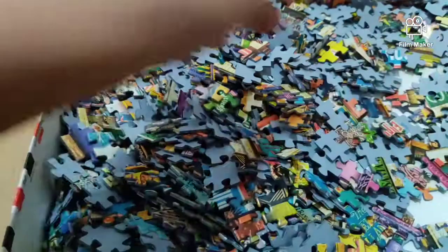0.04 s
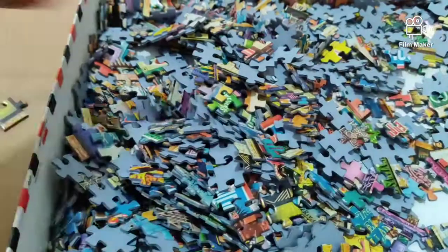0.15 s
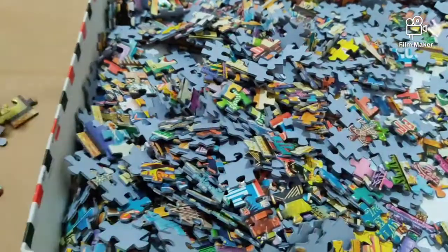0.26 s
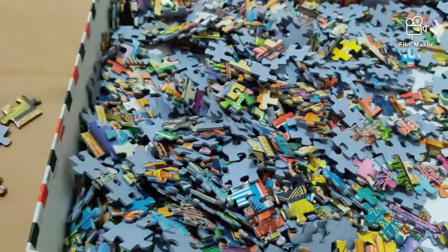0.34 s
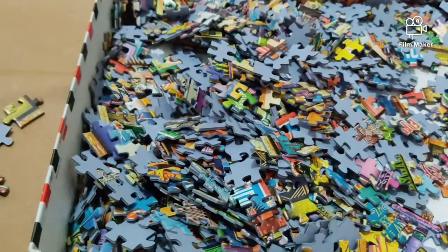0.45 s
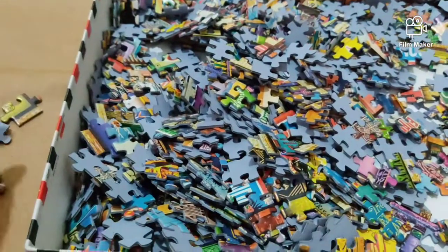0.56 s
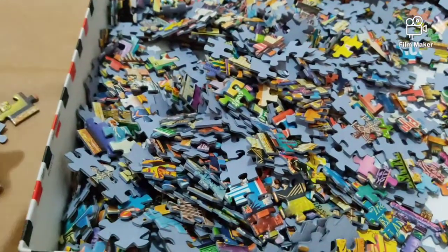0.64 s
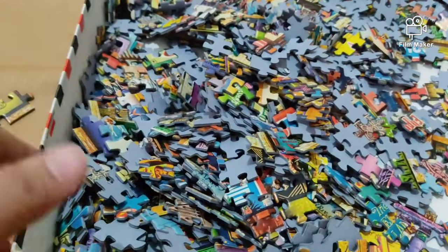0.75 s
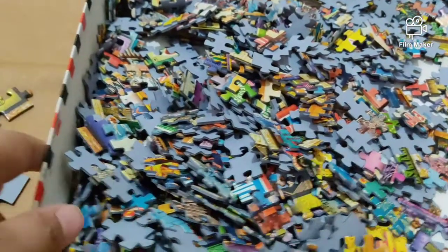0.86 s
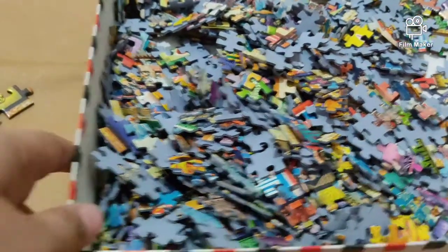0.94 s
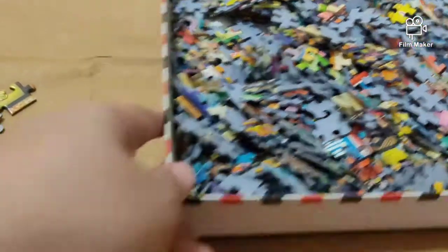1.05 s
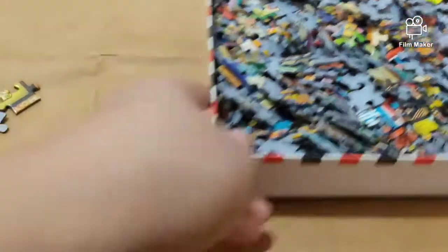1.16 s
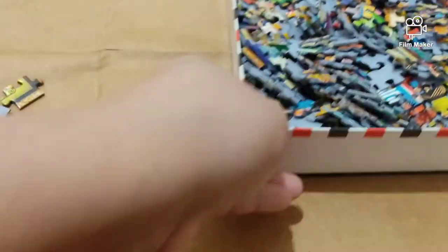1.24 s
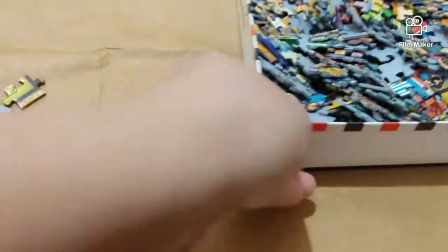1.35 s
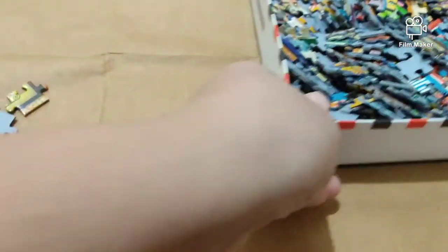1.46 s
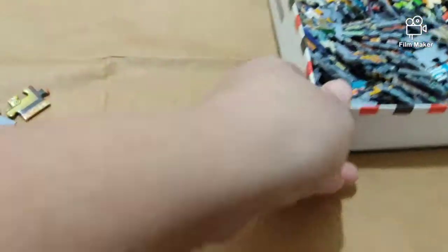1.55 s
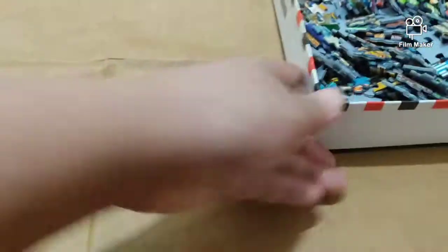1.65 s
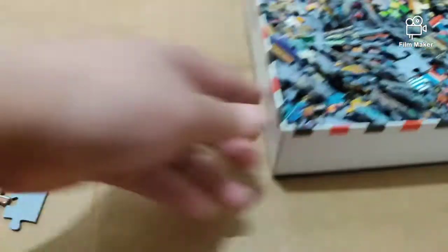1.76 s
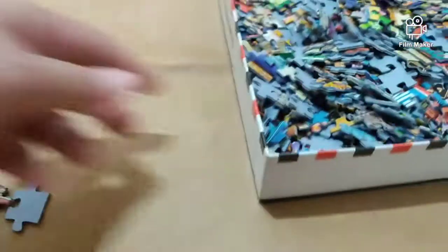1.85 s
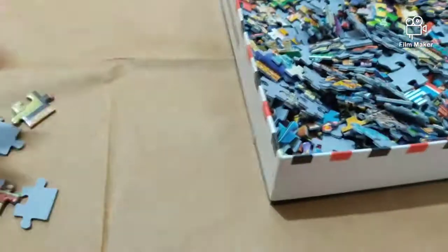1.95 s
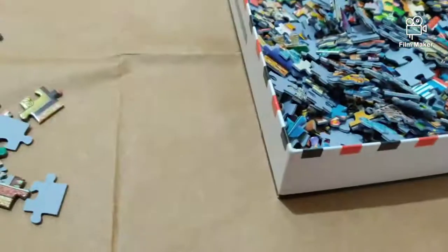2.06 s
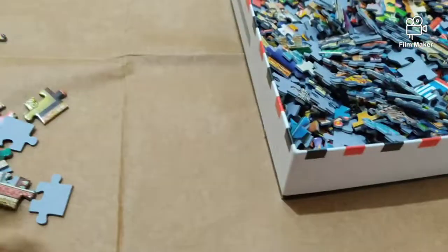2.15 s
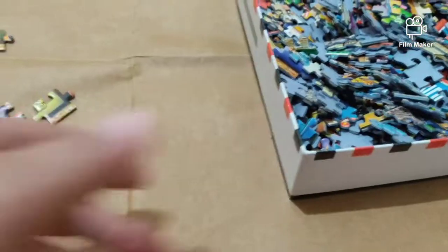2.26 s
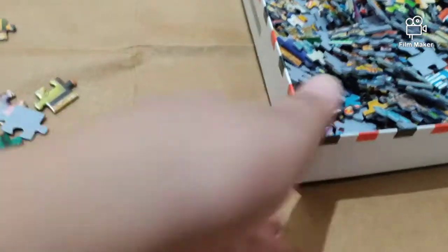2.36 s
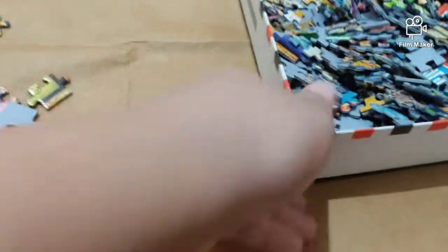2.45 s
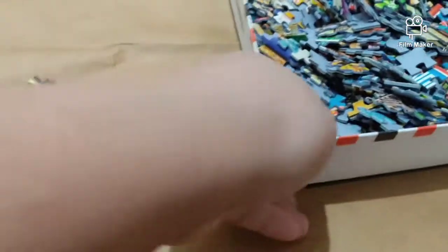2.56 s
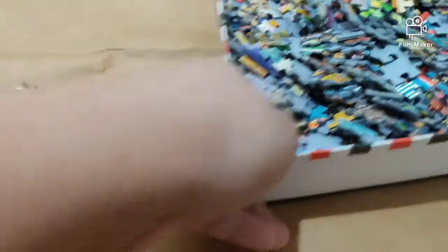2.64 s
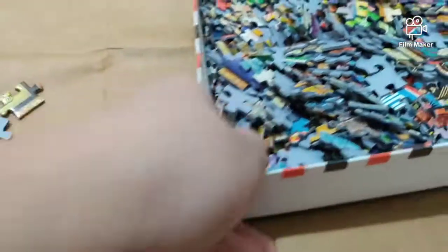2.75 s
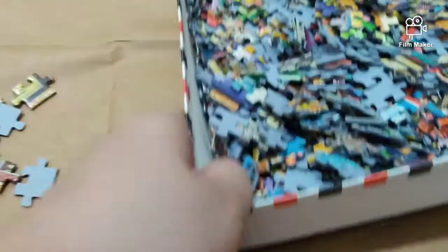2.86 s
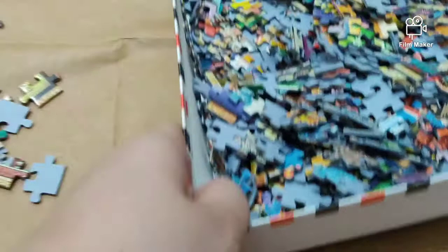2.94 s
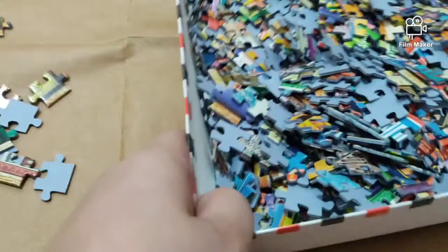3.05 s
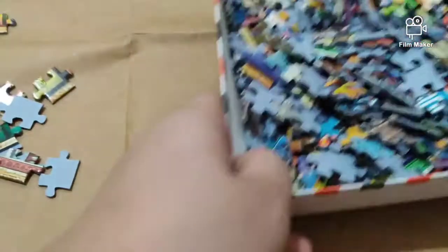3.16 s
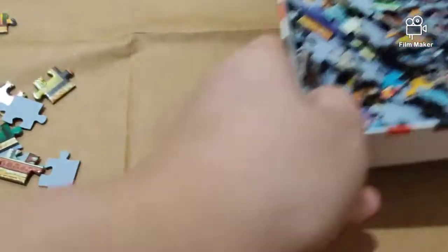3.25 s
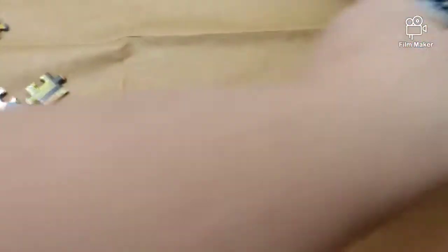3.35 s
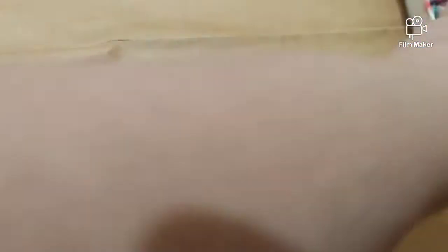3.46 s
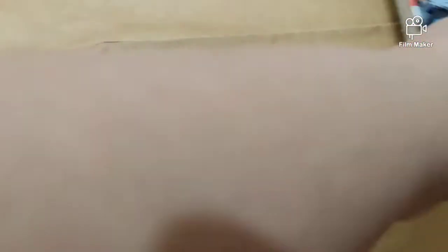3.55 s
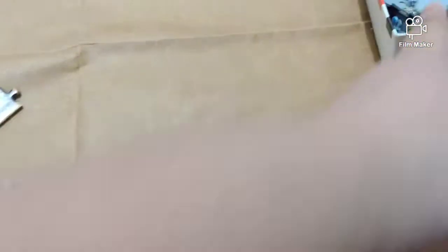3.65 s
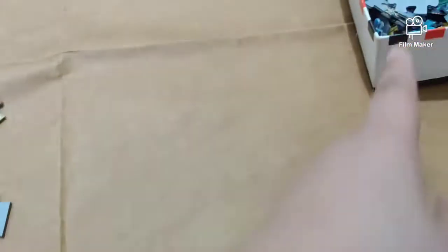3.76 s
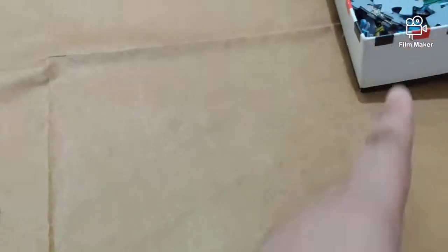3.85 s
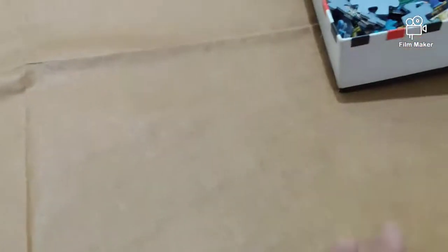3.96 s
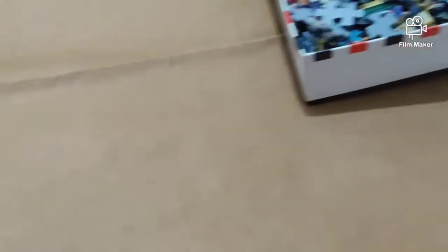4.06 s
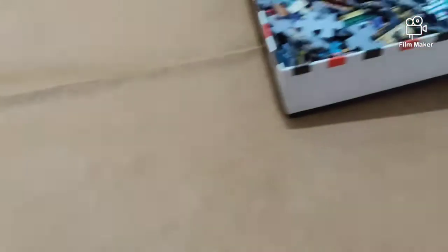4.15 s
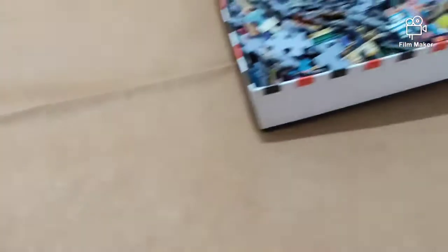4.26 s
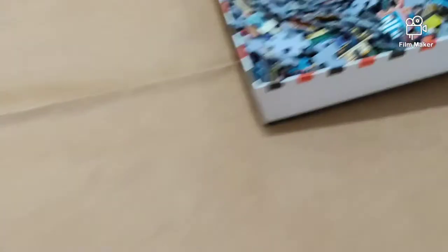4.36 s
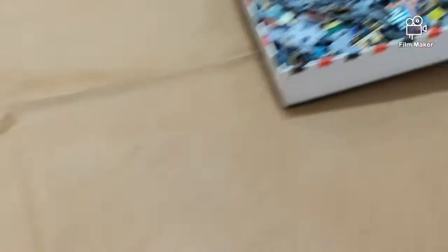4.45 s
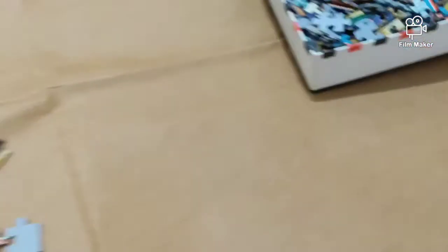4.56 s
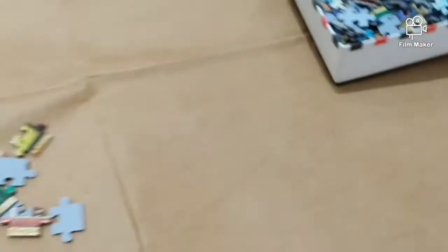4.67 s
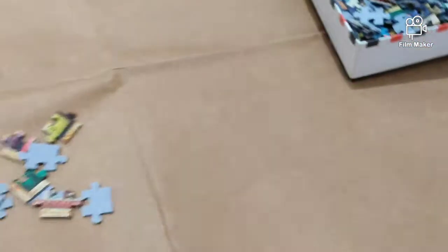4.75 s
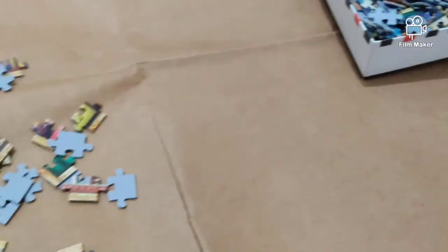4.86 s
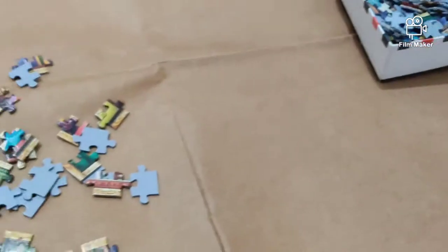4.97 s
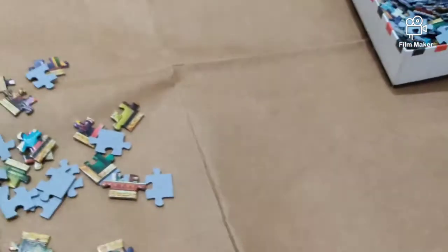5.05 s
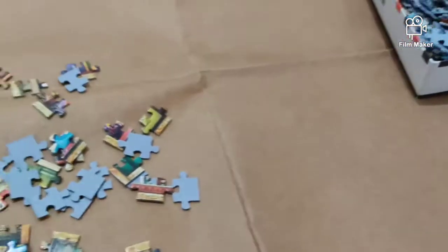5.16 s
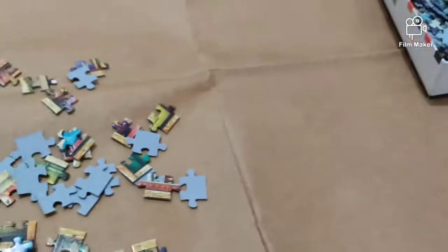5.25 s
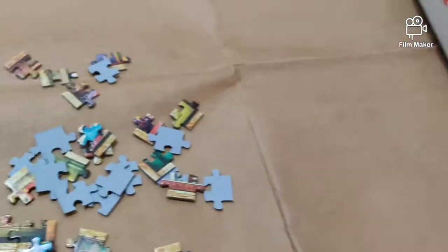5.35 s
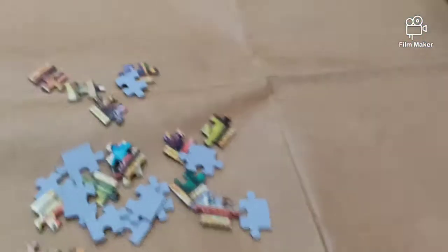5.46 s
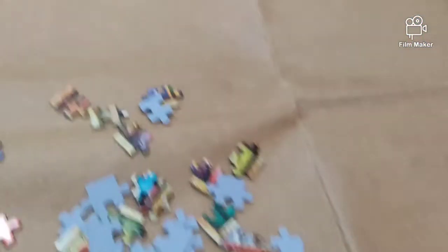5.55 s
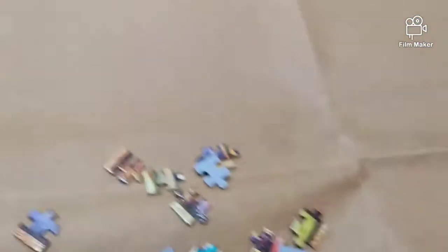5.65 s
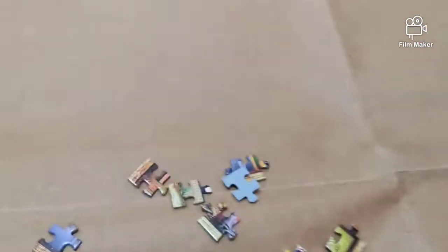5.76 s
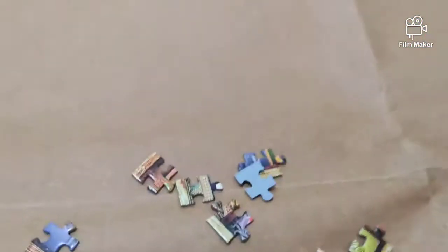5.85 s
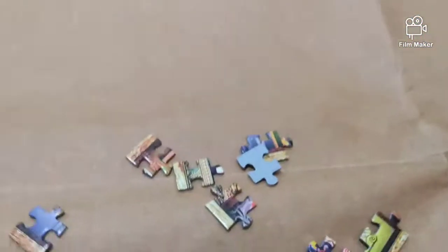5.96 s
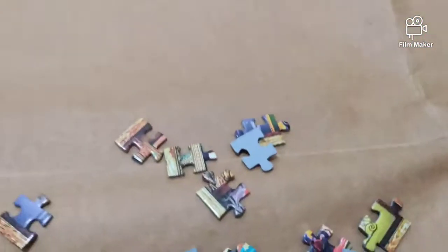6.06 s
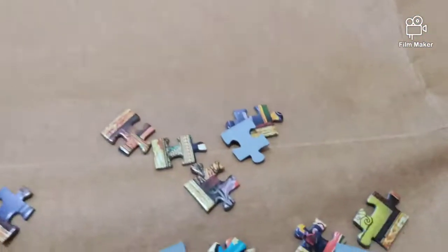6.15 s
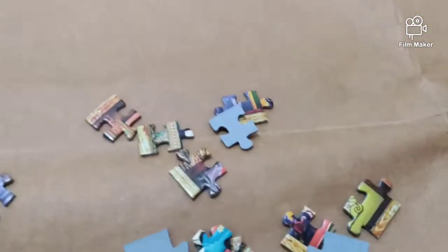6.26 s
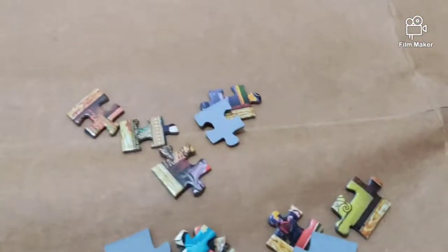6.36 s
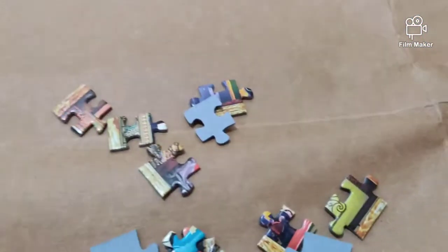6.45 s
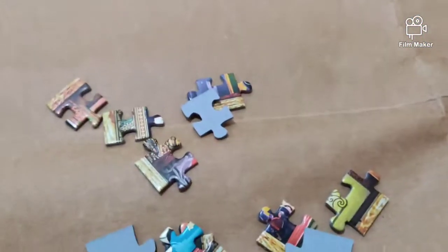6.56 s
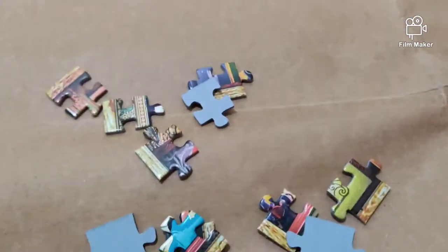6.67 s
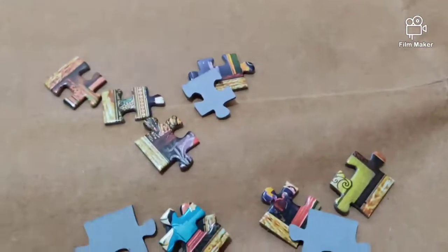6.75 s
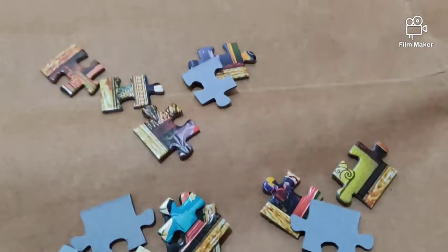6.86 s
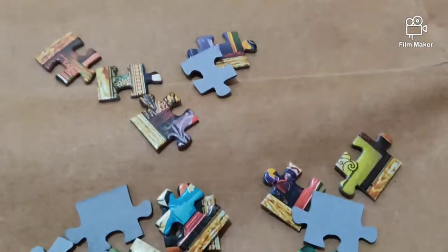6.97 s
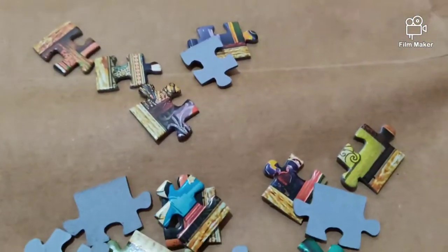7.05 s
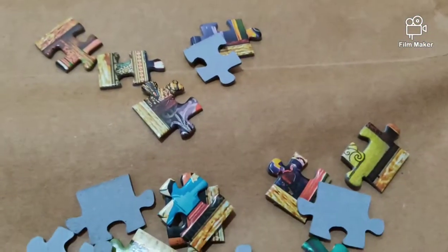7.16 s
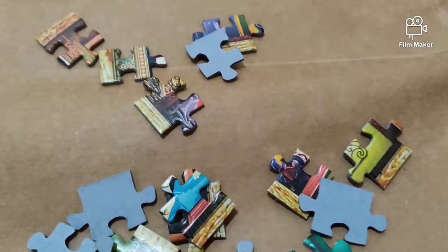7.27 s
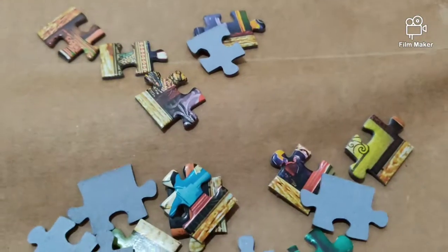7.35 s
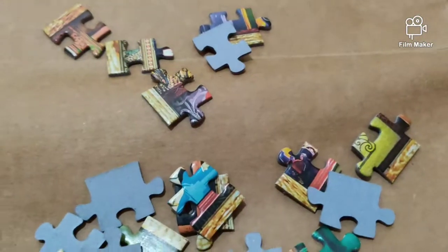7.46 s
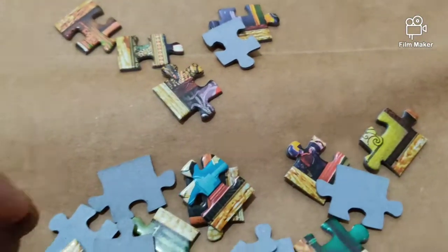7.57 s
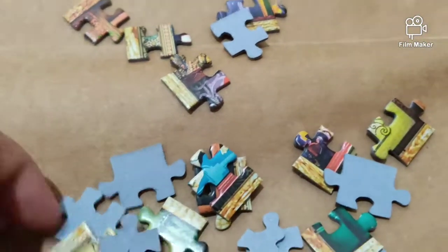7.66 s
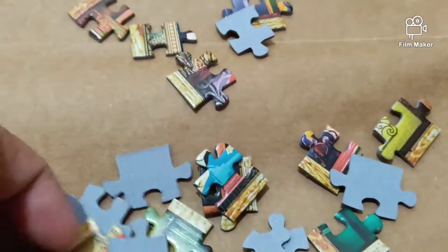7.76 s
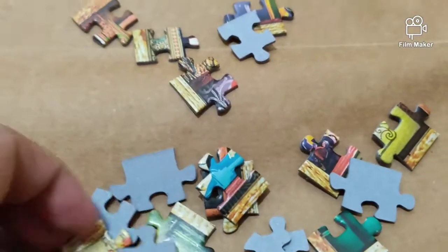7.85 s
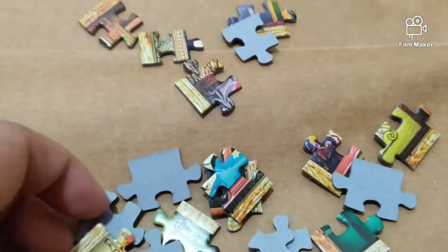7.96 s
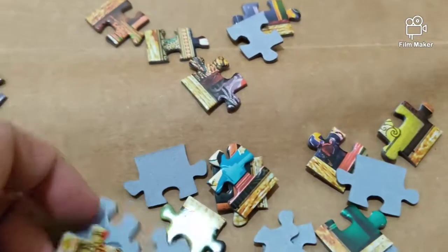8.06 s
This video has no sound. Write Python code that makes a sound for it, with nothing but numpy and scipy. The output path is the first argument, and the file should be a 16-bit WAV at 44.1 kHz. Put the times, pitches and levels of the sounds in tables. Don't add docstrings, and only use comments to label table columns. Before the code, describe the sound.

Dry papery scuffs come in uneven strokes as a hand shoves a box full of jigsaw pieces over a card-covered surface, with dull hollow knocks and small piece ticks. One bright, hard scrape and clatter peaks midway, then it calms to faint sliding. Soft fingertip thuds and tiny sharp snaps follow, close up, with slight room ring, low rumble and faint hiss.

```python
import sys
import numpy as np
from scipy import signal
from scipy.fft import rfft, irfft, next_fast_len
from scipy.io import wavfile
from scipy.ndimage import map_coordinates

SR = 44100
rng = np.random.default_rng(int(sys.argv[2]) if len(sys.argv) > 2 else 0)


def unload_audio(sound):
    columns = np.transpose(np.atleast_2d(sound))
    steps = np.round(np.clip(columns, -1, 1) * 32767)
    wavfile.write(sys.argv[1], SR, steps.astype(np.int16))


def gain_from_db(level_db):
    decades = np.asarray(level_db, float) / 20
    return 10 ** decades


N = 357651
SIDES = np.array([[.5], [-.5]])

# f/Hz, level/dB
SCUFF_COLOUR = [(1500, -31), (2500, -3), (4000, -5), (6000, -1.4), (8500, 2.5), (11000, -1), (14500, -9),
                (15500, -15), (16200, -59)]
# f/Hz, level/dB
CLATTER_COLOUR = [(290, -31.5), (500, -21), (629, -6.5), (792, -4.5), (978, -5.5), (1290, -9), (2660, -12),
                  (4500, -31.5), (5850, -73), (9900, -120)]
# f/Hz, width/Hz, level/dB
SHEET_MODES = [(180, 30.4, 0), (302.6, 82.5, -0.5), (418, 139, -5), (636, 192, -11)]
# t/s, left-right/dB
HAND_PAN = [(0, -3.5), (.6, -2.5), (.95, 0.5), (1.7, 5.5), (2.2, -5), (2.7, 4), (3.0, -1), (3.3, 10),
            (3.47, 8.5), (3.55, -0.5), (3.75, 5.5), (4.1, -3), (5.999, 0), (6.5, -6.5), (6.802, -3.5),
            (7.25, -9.5), (7.7, -4), (8.11, -6)]


def rubbing():
    scuffing, clattering, drumming = strokes()
    pan_db = np.interp(np.arange(N) / SR, *np.transpose(HAND_PAN))
    stutter_db = 1.01 * wobble(35) + 0.89 * wobble(140)

    fibres = grit(causal(SCUFF_COLOUR), 2500, spread_db=1.5, smooth=5.2)
    scuff = scuffing * gain_from_db(-5.5 + stutter_db + pan_db * SIDES) * fibres

    pieces = grit(causal(CLATTER_COLOUR), 900, spread_db=0.0, smooth=2.74)
    clatter_db = stutter_db + 1.5 * wobble(14) + 0.42 * pan_db * SIDES
    clatter = clattering * gain_from_db(clatter_db) * pieces

    card = grit(modes(SHEET_MODES), 300, spread_db=3.0, smooth=1.12)
    drum = drumming * gain_from_db(stutter_db + 4.46 * wobble(18)) * card
    return scuff + clatter + drum


# fastest t/s, speeding up/s, slowing down/s, scuff level/dB, load level/dB
BOX_DRAGS = [(.14, 0.47, 0.59, -55, -15), (.45, 0.045, .05, -72, 1), (.83, 0.055, 0.086, -55.5, -3),
             (1.102, 0.26, 0.19, -29.5, -16), (1.561, 0.79, 0.23, -38.5, -15),
             (1.789, 0.12, 0.19, -34, -11.5), (1.95, 0.2, 0.052, -54, 4), (2.27, 0.6, 0.2, -59, -13),
             (2.47, 0.094, 0.091, -41.5, -9.5), (2.72, 0.12, 0.24, -41, -12), (2.9, 0.12, 0.12, -40, -11.5),
             (3.15, .14, 0.084, -48.5, -4), (3.281, 0.077, 0.083, -42, -4), (3.46, 0.083, 0.088, -32.5, -2),
             (3.515, 0.058, 0.089, -21, -1), (3.7, 0.27, 0.13, -46, -1), (3.9, 0.36, 0.12, -45, -12.5)]
# t/s, up/s, down/s, scuff level/dB, load level/dB
HAND_SLIDES = [(4.05, 0.15, 0.56, -54.5, -11.5), (4.6, 0.52, .3, -50.5, -15), (4.89, 0.28, 0.26, -45, -8.5),
               (5.12, 0.24, 0.23, -56, -6.5), (5.34, 0.17, 0.11, -59.5, -6.5), (5.56, 0.13, 0.19, -51, -18),
               (5.9, 0.45, 0.7, -56, -4.5), (6.17, .03, 0.053, -43.5, -11.5),
               (6.12, 0.073, 0.037, -50.5, -15), (6.29, 0.11, 0.19, -49.5, -14),
               (6.551, 0.032, 0.058, -39, 2), (6.64, 0.16, 0.11, -37.5, -9),
               (6.75, 0.08, 0.045, -35.5, -13.5), (6.819, 0.058, 0.056, -46, -14),
               (7.56, 0.056, .1, -66, -8), (7.63, .07, 0.075, -48, -16), (7.77, 0.025, 0.093, -46.5, -20),
               (7.98, 0.16, 0.6, -51.5, -18)]
# t/s, time to lose 20 dB/s, scuff level/dB, load level/dB, drumming over load/dB
SHOVES = [(0.561, 0.32, -42, -5.5, 8), (0.651, .16, -41, -4, 1), (2.052, -0.38, -55, 4, -6),
          (2.398, 1, -49.5, -8, 9), (3.498, 0.0615, -15, -6, -20), (3.614, 0.143, -34.5, 2.5, -9.5),
          (6.047, 0.016, -52, 8.5, 15), (6.443, 0.44, -49, 2, 3), (7.205, 0.03, -52, 9.5, 6.5),
          (7.274, 0.1, -39.5, 3.5, 1), (7.514, 4, -56.5, -3, 5), (7.653, 0.17, -39.5, -1.5, 1.5),
          (7.715, 0.17, -43, -5, 4.5), (8.089, 4, -42.5, 2, -1)]


def strokes():
    stroke_bend, jolt_bend = 2, 1
    jolt_rise_s = 0.003
    load_drums = 0.66
    rows = []
    for table, drum_db in ((BOX_DRAGS, -8), (HAND_SLIDES, -3)):
        for s, up, down, db, load_db in table:
            over_load_db = drum_db + (load_drums - 1) * load_db
            rows.append((s, up, down, db, load_db, over_load_db, stroke_bend))
    for s, down, db, load_db, drum_db in SHOVES:
        rows.append((s, jolt_rise_s, down, db, load_db, drum_db, jolt_bend))

    t = np.arange(0, N, 64) / SR
    s, up, down, db, load_db, drum_db, bend = np.transpose(rows)[:, :, None]
    away = np.where(t < s, (s - t) / np.maximum(up, .001), (t - s) / np.maximum(down, .001))
    scuff = gain_from_db(np.maximum(db - 20 * away ** bend, -200))
    layers = scuff, scuff * gain_from_db(load_db), scuff * gain_from_db(load_db + drum_db)
    return [np.interp(np.arange(N) / SR, t, np.sqrt(np.sum(gain ** 2, axis=0))) for gain in layers]


# t/s, peak level/dB, sheet pitch f/Hz, slap level/dB
BOX_LANDINGS = [(.559, -16, 310, -21), (.57, -16, 222, -10.5), (.651, -24.5, 436, -9.5),
                (.678, -24.5, 400, -12), (.695, -41, 280, -9), (.734, -53, 194, -15), (.82, -38, 292, -2),
                (1.198, -30, 235, 0), (1.264, -33.5, 546, 0), (1.518, -32.5, 193, -13),
                (2.044, -34.5, 950, -9), (2.399, -23.5, 257, -10.5), (2.47, -31, 280, -0.5),
                (2.553, -34, 183, -35), (2.658, -34, 288, -7), (2.684, -43.5, 168, 14.5),
                (3.126, -40, 266, -8), (3.314, -32.5, 351, -23), (3.449, -37.5, 268, 15.5),
                (3.485, -27, 58, -25), (3.49, -14, 232, 0), (3.513, -18.5, 348, 2)]
# t/s, peak level/dB, sheet pitch f/Hz, slap level/dB
FINGER_TAPS = [(4.218, -52, 196, 0), (4.609, -37, 254, -1), (4.63, -36.5, 300, -14),
               (5.193, -41, 1100, -1.5), (5.33, -40.5, 200, -0.5), (5.347, -34, 197, -15),
               (5.681, -39.5, 213, -3), (6.044, -29.5, 208, -4), (6.162, -30, 179, -6),
               (6.444, -31, 274, -16), (6.575, -29.5, 194, -2), (6.606, -26, 189, -4.5),
               (6.645, -27, 266, -8), (6.685, -29, 180, -5), (6.81, -29, 257, -9.5),
               (7.201, -33.5, 225, -3), (7.28, -28, 750, -2), (7.281, -25.5, 194, -16),
               (7.511, -34.5, 191, -6), (7.55, -34.5, 197, -14), (7.69, -33, 191, -8.5),
               (7.655, -25.5, 773, -12), (7.718, -30.5, 294, 1.5), (7.777, -52, 210, -18),
               (7.873, -38, 715, -9), (7.944, -35.5, 219, -5), (7.965, -36.5, 785, 0),
               (8.088, -39, 334, -2)]
# f/Hz, width/Hz, level/dB
FINGER_PAD = [(650, 350, 0)]


def knocks():
    out, t = np.zeros((2, N + SR)), np.arange(SR // 4) / SR
    fade = gain_from_db(-60 * t / 0.083) * (1 - np.exp(-t / 0.0024))
    slap_rise = 1 - np.exp(-t / .001)
    for table, colour in ((BOX_LANDINGS, causal(CLATTER_COLOUR)), (FINGER_TAPS, modes(FINGER_PAD))):
        for s, db, hz, slap_db in table:
            spot = np.sin(2 * np.pi * hz * t) * gain_from_db(-.7 * hz * t)
            sheet = np.zeros(len(t))
            for mode_hz, _, level_db in SHEET_MODES:
                gain = gain_from_db(level_db - 8 + rng.normal(0, 1.75))
                sheet += gain * np.sin(2 * np.pi * mode_hz * rng.normal(1, 0.066) * t)
            slap = unit(filtered(burst_noise(len(t)), colour))
            slap = slap * gain_from_db(slap_db + 2 - 60 * t / 0.037) * slap_rise
            out[:, round(s * SR):][:, :len(t)] += gain_from_db(db - 3.0) * ((spot + sheet) * fade + slap)
    return out[:, :N]


# t/s, peak level/dB, left-right/dB, dull part
# level/dB
PIECE_TICKS = [(0.56, -16, 1, -18.5), (0.5693, -20.5, -2, -9), (0.5856, -25, 3, -34),
               (.652, -30.5, 7, -13.5), (0.6762, -26, -.5, -25), (0.736, -27.5, 3.5, -33),
               (0.822, -32, -1, -28), (2.049, -31.5, 5, -27), (2.4, -29, 3.5, -11),
               (2.7346, -23, 11.5, -24.5), (3.234, -41, 14, -22.5), (3.317, -32.5, 29, -24.5),
               (3.452, -20.5, 16, -11.5), (3.47, -24, 14.5, -22), (3.5, -7, -6, -34.5),
               (3.5235, -14.5, -16.5, -20), (3.6183, -29, 5.5, -18), (3.642, -21.5, 7.5, -10.5),
               (6.1484, -29, -1.5, -35), (6.4425, -34.5, -3.5, -4.5), (6.799, -34, 1, -30.5),
                  (7.201, -34, -12.5, -3), (7.228, -43, -5.5, -4), (7.24, -38.5, -4, -7),
                  (7.2687, -27.5, -12.5, -7.5), (7.286, -29, 3, -12), (7.354, -30, -6.5, -10),
                  (7.513, -36, -17.5, -16), (7.6548, -22.5, -1.5, -19), (7.693, -22.5, -6, -37),
                  (7.874, -33, -8.5, -21.5), (7.9467, -41, -3, -20), (7.9645, -39, -7, -34),
                  (8.089, -25, -9.5, -21)]


def ticks():
    bright, dull = np.zeros((2, N + SR)), np.zeros((2, N + SR))
    t = np.arange(SR // 10) / SR
    for s, db, pan_db, dull_db in PIECE_TICKS:
        burst = burst_noise(len(t)) * gain_from_db(db - 60 * t / 0.01)
        add(bright, s, pan_db, burst)
        add(dull, s, 0.35 * pan_db, gain_from_db(dull_db) * burst)
    bright = gain_from_db(-7) * filtered(bright, causal(SCUFF_COLOUR))
    dull = gain_from_db(10.0) * filtered(dull, modes([(2750, 3400, 0.004)]))
    return (bright + dull)[:, :N]


# t/s, peak level/dB, left-right/dB, pitch f/Hz, t60/s
SINGING_FLICKS = [
    (.4255, -60, 7, 7960, .02),
    (2.732, -30, 11, 14830, 0.0083),
    (7.7097, -24, -12, 8000, 0.0043),
    (7.7173, -4.5, -15.5, 8570, 0.0049),
    (7.726, -40, -20, 8900, .012),
    (7.749, -35, -1.5, 8800, 0.011),
]


def flicks():
    out, t = np.zeros((2, N + SR)), np.arange(SR // 20) / SR
    swell = (1 - np.exp(-t / 0.00056)) ** 2
    for s, db, pan_db, hz, t60 in SINGING_FLICKS:
        drift = 0.045 * np.cumsum(rng.standard_normal((2, len(t))), axis=1)
        song = np.sin(2 * np.pi * hz * t + drift)
        add(out, s, pan_db, 3 * gain_from_db(db - 60 * t / t60) * swell * song)
    return out[:, :N]


# f/Hz, t60/s
WALL_T60 = [(200, 0.31), (2000, 0.48), (10000, 0.26)]


def walls(x):
    hz, t, z = signal.stft(rng.standard_normal((2, SR // 3)), SR, nperseg=256)
    fade = gain_from_db(-60 * t / along(WALL_T60, hz)[:, None])
    tail = signal.istft(z * fade, SR, nperseg=256)[1]
    late = np.pad(x, ((0, 0), (200, 0)))
    return signal.fftconvolve(late, tail / np.linalg.norm(tail[0]), axes=1)[:, :N]


# f/Hz, level/dB
ROOM_COLOUR = [(12, -41), (20, -1.5), (32, -9.5), (62, -6.5), (86, -23.5), (190, -13), (270, -18.5),
               (320, -24.5), (1000, -33), (2000, -39), (5000, -41.5), (9000, -41), (15000, -44),
               (16200, -93)]
# f/Hz, level/dB
FAN_HUM = [(59.2, -60.5)]


def room_tone():
    (hz, db), = FAN_HUM
    phase = 2 * np.pi * np.cumsum(hz + 5 * wobble(16)) / SR
    fan = gain_from_db(db + 1.6 * wobble(11.0) + 3.1 * SIDES) * np.sin(phase)
    level_db = -56 + .8 * wobble(3)
    return fan + gain_from_db(level_db) * grit(causal(ROOM_COLOUR), 500, spread_db=5.0, smooth=2.7)


# f/Hz, likeness 0-1
PORT_LIKENESS = [(60, 0.36), (180, 0.91), (400, 0.69), (800, 0.8), (1650, 0.083), (15000, 0.033)]


def grit(response, rate, spread_db, smooth):
    sizes = gain_from_db(spread_db * np.minimum(rng.exponential(size=N), 3))
    catches = (rng.random(N) < rate / SR) * sizes
    pair = rng.standard_normal((2, N)) * (smooth + unit(catches))

    def mid_side(hz):
        turn = np.arccos(np.clip(along(PORT_LIKENESS, hz), -1, 1)) / 2
        return response(hz) * [np.cos(turn), np.sin(turn)]

    mid, side = filtered(pair, mid_side)
    return unit(np.array([mid + side, mid - side]))


def burst_noise(length):
    return rng.standard_normal(length) + 0.63 * rng.standard_normal((2, length))


def add(out, s, pan_db, pair):
    panned = gain_from_db(pan_db * SIDES) * pair
    for port, late_db in enumerate((max(-pan_db, 0), max(pan_db, 0))):
        start = round((s + .00003 * late_db) * SR)
        out[port, start:][:pair.shape[1]] += panned[port]


def modes(rows):
    def response(f):
        total = 0
        for k, (c, w, db) in enumerate(rows):
            total = total + (-1) ** k * gain_from_db(db) * 1j * f * w / (c * c - f * f + 1j * f * w)
        return total
    return response


def causal(spectrum):
    def response(hz):
        cepstrum = irfft(np.log(gain_from_db(along(spectrum, hz)) + 1e-4))
        half = len(cepstrum) // 2
        cepstrum[1:half] *= 2
        cepstrum[half + 1:] = 0
        return np.exp(rfft(cepstrum))
    return response


def filtered(x, response):
    m = next_fast_len(x.shape[-1] + SR // 4)
    return irfft(rfft(x, m) * response(np.fft.rfftfreq(m, 1 / SR)), m)[..., :x.shape[-1]]


def along(points, hz):
    f, v = np.transpose(points)
    return np.interp(np.log(hz + 1), np.log(f + 1), v)


def wobble(rate):
    knots = rng.standard_normal(int(N * rate / SR) + 4)
    return map_coordinates(knots, [np.arange(N) * rate / SR])


def unit(x):
    return x / np.sqrt(np.mean(x ** 2) + 1e-20)


def scene():
    hits, rub = knocks() + ticks() + flicks(), rubbing()
    return hits + walls(gain_from_db(-17) * hits + gain_from_db(-19) * rub) + rub + room_tone()


# resonance f/Hz, width/Hz, notch f/Hz, width/Hz
PORT_CAVITIES = [
    (8840, 820, 10450, 1600),
    (7660, 680, 10500, 3040),
]
# f/Hz, left-right/dB
PORT_BALANCE = [(60, 3), (120, 3.5), (480, 2.5), (1000, 2.5), (4000, 0), (8000, 4.5), (15000, 6.5)]


def ports(dry):
    c, w, z, v = np.transpose(PORT_CAVITIES)[:, :, None]
    left_lag_s = 0.00021

    def response(f):
        cavity = (c / z) ** 2 * (z * z - f * f + 1j * f * v) / (c * c - f * f + 1j * f * w)
        balance = gain_from_db(along(PORT_BALANCE, f) * SIDES)
        return cavity * balance * np.exp(-2j * np.pi * f * left_lag_s * SIDES)

    return filtered(dry, response)


def roll_off(x):
    return signal.sosfilt(signal.butter(12, 16540, fs=SR, output="sos"), x)


def record(dry):
    heard = ports(dry)
    rounded = heard / (1 + np.abs(heard / .85) ** 4) ** .25
    return roll_off(rounded)


dry = scene()
out = record(dry)
unload_audio(out)
```